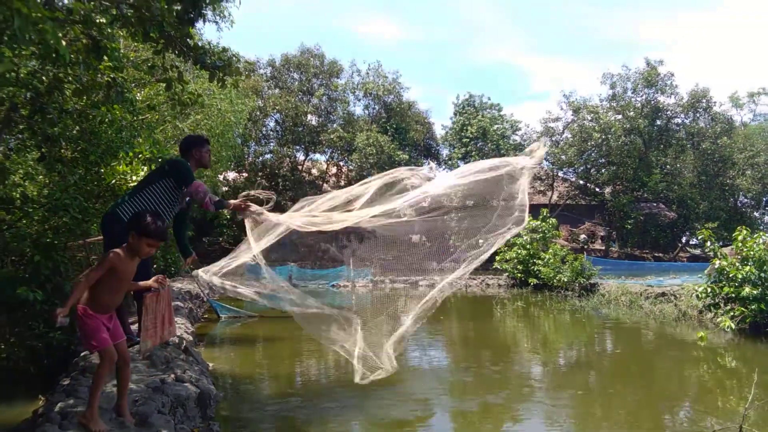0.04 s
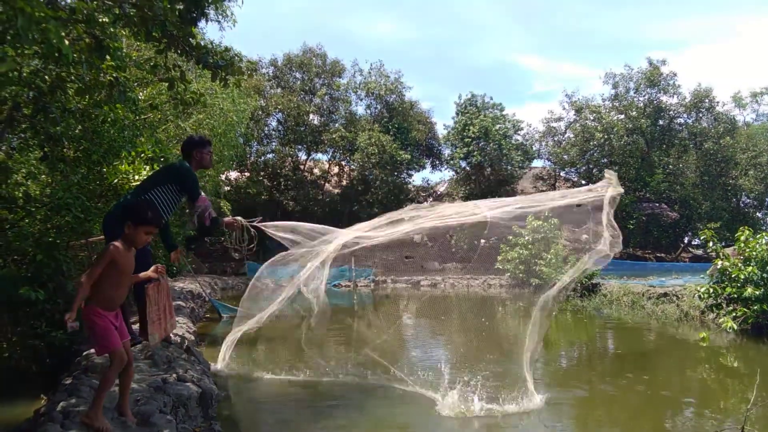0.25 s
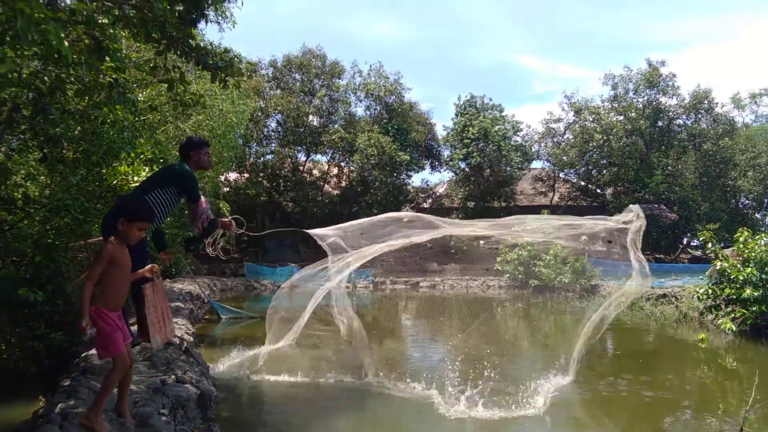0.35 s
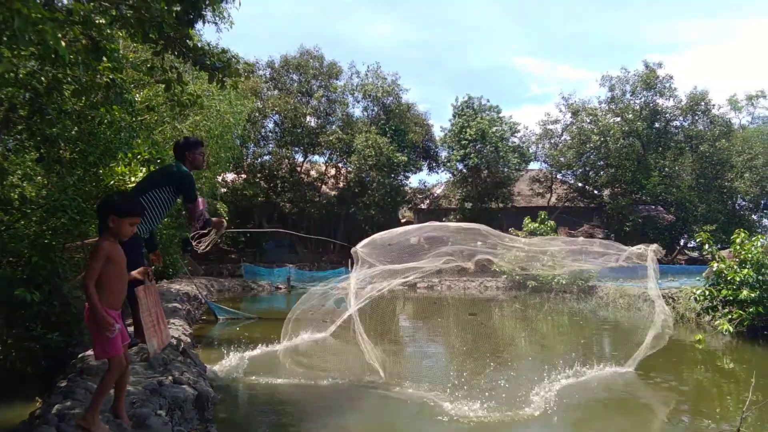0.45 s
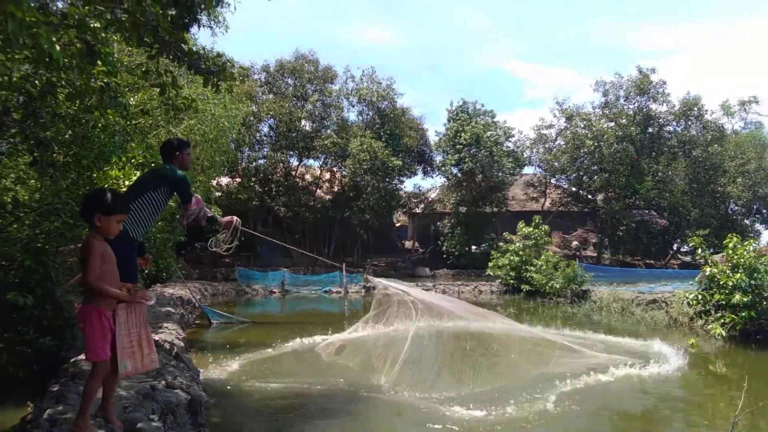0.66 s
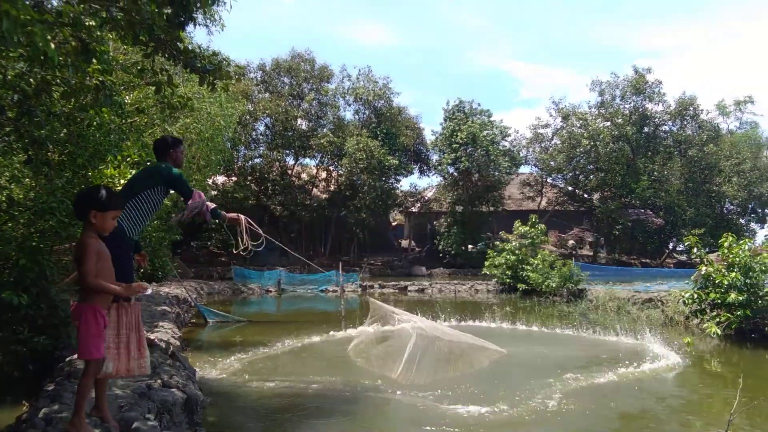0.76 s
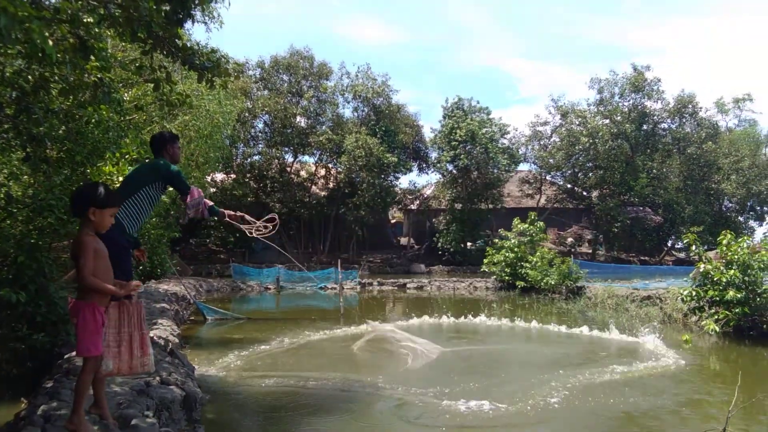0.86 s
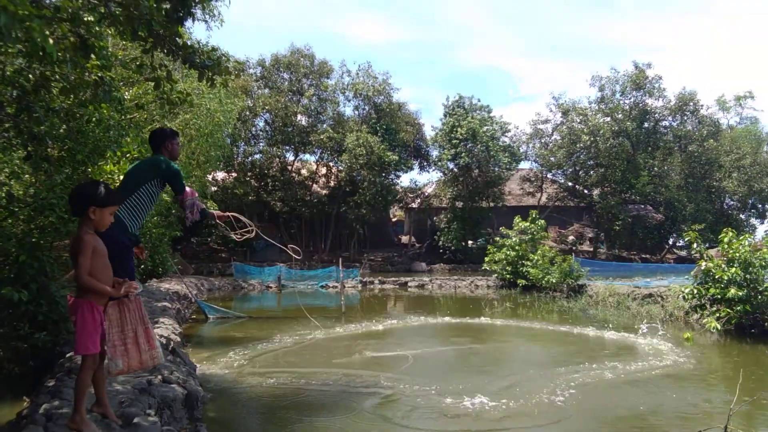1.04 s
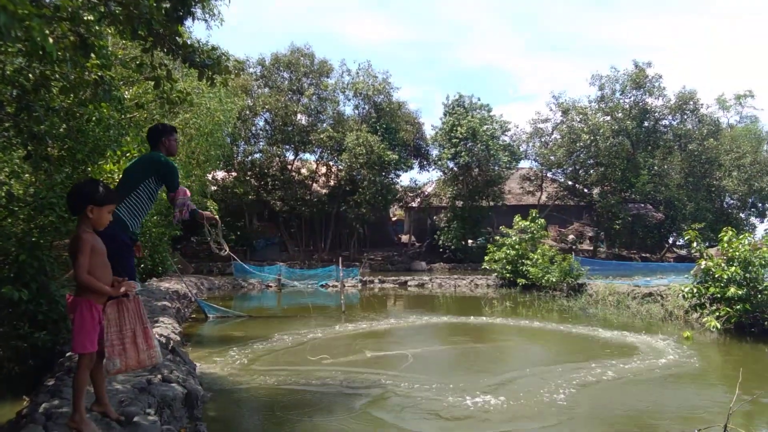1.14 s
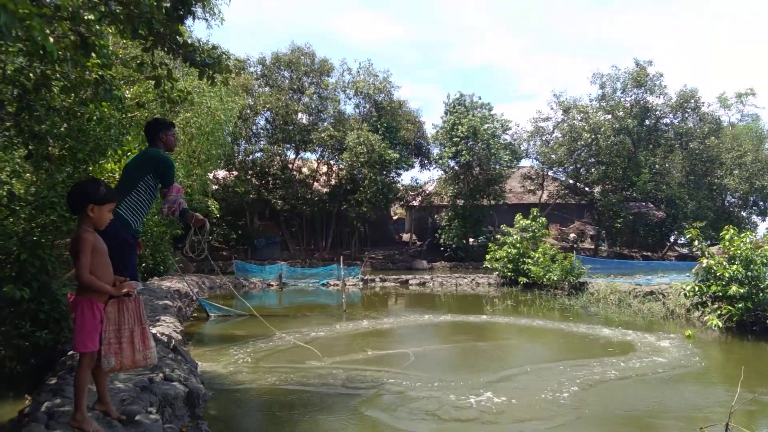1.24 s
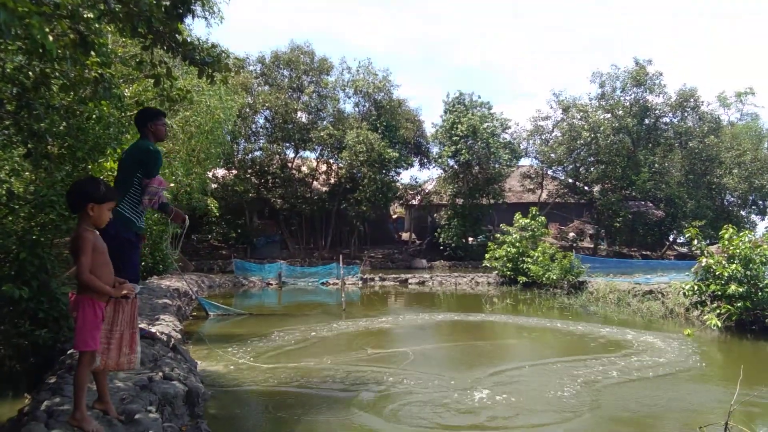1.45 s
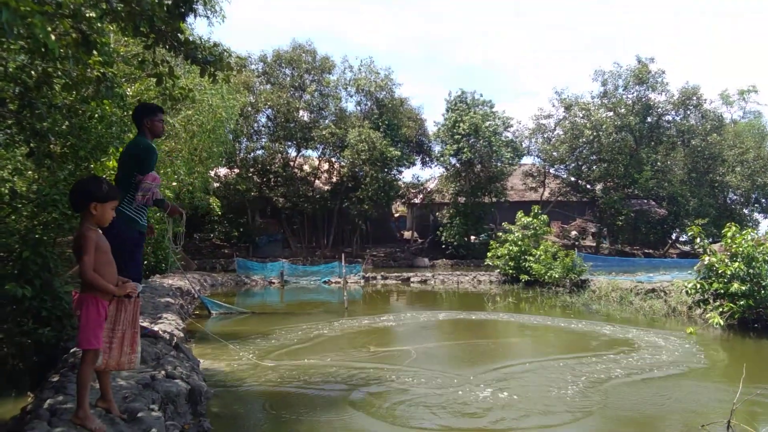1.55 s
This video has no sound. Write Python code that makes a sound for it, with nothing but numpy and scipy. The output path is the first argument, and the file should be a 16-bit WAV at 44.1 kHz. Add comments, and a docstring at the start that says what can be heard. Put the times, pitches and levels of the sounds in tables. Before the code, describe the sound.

A cast net splashes onto a pond. A bright spray starts at about 0.2 seconds, and the weighted rim slaps the water at 0.3. Droplets spatter with fizz, bubbles and small plops until about 1 second, then die away by 1.5. A faint low outdoor rumble and hiss run underneath, with one soft bump near 1.4 seconds and a very faint distant bird chirp just after.

```python
"""A cast net on a pond

A faint, brief hiss opens the scene. The net's weighted rim zips into the water with a bright spray, slaps
down and runs round the circle. Droplets spatter and entrained air rings as bubbles and a few deep plops;
then the mesh settles and the fizz dies away. Bank and trees scatter the sound. Behind it are a low
outdoor rumble, a faint hiss, a far bird and one soft bump."""
import sys
import numpy as np
from scipy import signal
from scipy.fft import rfft, irfft
from scipy.io import wavfile
from scipy.ndimage import map_coordinates

SR = 44100
rng = np.random.default_rng(int(sys.argv[2]) if len(sys.argv) > 2 else 0)


def materialize(psi):
    """Save the field psi as 16-bit PCM at rate SR to the path in sys.argv[1].

    A 1-D psi becomes a single channel; in a 2-D psi each row is a channel.
    """
    bounded = np.clip(np.atleast_2d(psi).T, -1, 1)
    quanta = np.round(bounded * 32767).astype(np.int16)
    wavfile.write(sys.argv[1], SR, quanta)


N = 70560

# Spectra of the sources (frequency [Hz], relative level [dB])
AIR_SPECTRUM = [(20, -26), (35, -20), (60, 1), (110, 5), (160, -1.5), (220, -7.5), (500, -14.5),
                (1000, -19), (2000, -19), (2600, -17), (3900, -23.5), (5700, -16), (6800, -20.5),
                (8500, -34), (12000, -42), (15500, -40)]
SPRAY_SPECTRUM = [(1000, -26), (1900, -16), (2400, -1.5), (3700, -12), (4700, -4), (6300, 1.5),
                  (7300, -10.5), (8500, -18), (12000, -25.5), (15500, -23)]
SPATTER_SPECTRUM = [(500, -39), (1030, -6.5), (1200, 1.5), (1450, -1), (1750, -2), (2050, -2.5), (2530, 1),
                    (2950, -8.5), (3500, -6), (4600, -19), (9000, -40.5)]
FIZZ_SPECTRUM = [(1500, -55.5), (2400, 1), (3900, -7.5), (5300, -1), (6200, -1), (7000, -5.5),
                 (8000, -17.5), (9000, -22), (12000, -33.5), (15500, -25.5)]
BUBBLE_SPECTRUM = [(60, -78), (170, -33.5), (250, -17.5), (380, -7.5), (550, 0), (720, 1), (900, 3.5),
                   (1050, -10.5), (1600, -19.5)]
# A faint, brief hiss at the very start, then sheets of spray (time [s], level [dB], attack [s], T60 [s])
SPRAYS = [(-.002, -50, 0.0035, 0.12), (0.2053, -42, 0.003, 0.04), (0.2465, -32.3, 0.009, 0.06),
          (.71, -41.5, 0.01, 0.17)]
# Notes of the far bird (time [s], duration [s], start frequency [Hz], end frequency [Hz], level [dB])
CHIRPS = [(0.07, 0.051, 5700, 4770, -66), (1.52, .045, 3400, 3750, -70), (1.538, .038, 5300, 4600, -65),
          (1.568, 0.024, 3970, 4010, -60)]
# Envelopes of the droplet spatter, fine fizz and bubbling (time [s], level [dB])
SPATTER_ENVELOPE = [(.2, -73), (.212, -59.5), (.28, -45.5), (.3, -39), (.322, -40.5), (.39, -43.5),
                    (.435, -41.5), (.51, -43), (.54, -39), (.57, -44), (.64, -42), (.73, -40.5),
                    (.8, -41.5), (.87, -48.5), (.97, -46.5), (1.045, -45.5), (1.09, -51), (1.2, -54),
                    (1.38, -66), (1.6, -77)]
FIZZ_ENVELOPE = [(.203, -91), (0.21, -41), (.28, -41.5), (.32, -41), (.38, -47), (.52, -43.5), (.64, -44.5),
                 (.735, -41), (.8, -44), (.89, -55), (.925, -51), (1.04, -48), (1.1, -52), (1.3, -62.5),
                 (1.6, -73)]
BUBBLE_ENVELOPE = [(.26, -74), (.295, -47.5), (0.321, -41), (0.346, -46), (.39, -51.5), (.435, -49),
                   (.51, -51.5), (.61, -50), (.68, -47), (.79, -41.5), (.84, -49), (.95, -59),
                   (1.01, -51.5), (1.09, -60), (1.25, -64), (1.45, -72.5)]
# Air pockets pulled under by the sinkers (time [s], frequency [Hz], level [dB], T60 [s])
AIR_POCKETS = [(.279, 790, -32.5, 0.019), (.296, 1666, -33, 0.033), (.3035, 790, -22.5, .016),
               (.3038, 2380, -16, .013), (.304, 1190, -32, .06), (.3097, 2500, -17, .017),
               (.318, 320, -35, .08), (.319, 850, -23.5, .026), (0.336, 260, -47.5, 0.1),
               (0.435, 1412, -28.5, 0.04), (.3535, 1230, -24.5, .021), (.481, 1640, -28, .02),
               (.534, 2500, -33, .035), (.662, 870, -26.5, 0.043), (0.688, 1130, -27, 0.035),
               (.726, 902, -30.5, 0.071), (0.739, 411, -37, 0.038), (.796, 680, -27, 0.038),
               (.799, 553, -29.5, 0.032), (.853, 587, -45, 0.056), (0.868, 451, -38.5, 0.079),
               (.893, 1380, -34, .025), (.917, 1217, -35, .025), (.968, 2380, -32.5, .018),
               (1.039, 1760, -36, .05), (1.447, 1520, -50.5, 0.031)]
# Impacts of the near rim on the water (time [s], level [dB])
RIM_IMPACTS = [(.304, -25), (.3102, -28)]


def amp(db):
    """Amplitude ratio of a level in decibels."""
    return 10 ** (np.asarray(db) / 20)


def unit_rms(x):
    """Normalisation to an rms of 1."""
    return x / np.sqrt(np.mean(x ** 2) + 1e-20)


def since(onset):
    """Seconds elapsed from the onset, zero before it."""
    return np.maximum(np.arange(N) / SR - onset, 0)


def decay(t, t60):
    """Exponential damping: 60 dB in t60 seconds."""
    return amp(-60 * t / t60)


def envelope(points):
    """Gain per sample, interpolated linearly in decibels."""
    return amp(np.interp(np.arange(N) / SR, *np.transpose(points)))


def wobble(knots_per_s):
    """Smooth random modulation: a spline through Gaussian values."""
    return map_coordinates(rng.standard_normal(N // 20), [np.arange(N) * knots_per_s / SR], mode="wrap")


def coloured(x, spectrum):
    """Minimum-phase filtering to a spectral shape, at an rms of 1."""
    size = 2 * N
    hz, db = np.transpose(spectrum)
    gain = amp(np.interp(np.log(np.fft.rfftfreq(size, 1 / SR) + 1), np.log(hz), db))
    cepstrum = irfft(np.log(gain), size)
    causal_fold = np.r_[1, np.full(N - 1, 2), np.zeros(N)]
    response = np.exp(rfft(cepstrum * causal_fold))
    return unit_rms(irfft(rfft(x, size) * response, size)[:N])


def ring(onset, hz, t60, rise, attack_s=0.0013):
    """A damped oscillator whose frequency at first climbs by the fraction rise per t60."""
    t = since(onset)
    phase = 2 * np.pi * hz * t * (1 + rise * np.minimum(t / t60, 2) / 2)
    return np.sin(phase) * decay(t, t60) * (1 - np.exp(-t / attack_s))


def outdoor_air():
    """Stationary broadband noise, heard as a low rumble and a faint hiss."""
    return amp(-58) * coloured(rng.standard_normal(N), AIR_SPECTRUM)


def sprays():
    """Transient noise: a faint, brief bright hiss at the very start, then spray as the net lands."""
    swell = sum(amp(db) * np.minimum(since(onset) / attack, 1) * decay(since(onset + attack), t60)
                for onset, db, attack, t60 in SPRAYS)
    return swell * coloured(rng.standard_normal(N), SPRAY_SPECTRUM)


def bird():
    """Frequency modulation: each thin note is a gliding tone with a slight waver."""
    notes = np.zeros(N)
    for onset, duration, start_hz, end_hz, db in CHIRPS:
        progress = np.minimum(since(onset) / duration, 1)
        hz = (start_hz + (end_hz - start_hz) * progress) * (1 + 0.02 * wobble(300))
        notes += amp(db) * np.sin(np.pi * progress) * np.sin(2 * np.pi * np.cumsum(hz) / SR)
    return notes


def bubble_cloud(per_s, lo_hz, hi_hz, cycles, spread_db, rise):
    """Bubble resonance in bulk: damped, rising sines of random onset, pitch, life and strength."""
    when, pitch, life, strength = np.hsplit(rng.random((int(per_s * N / SR), 4)), 4)
    hz = lo_hz * (hi_hz / lo_hz) ** pitch
    t60 = cycles * (.5 + life) / hz
    t = np.arange(int(min(t60.max(), .04) * SR) + 2) / SR
    gain = amp(spread_db * np.minimum(-np.log(1 - strength), np.pi)) * hz
    phase = 2 * np.pi * hz * t * (1 + rise * t / t60 / 2)
    rings = gain * decay(t, t60) * np.sin(phase)
    samples = (when * N).astype(int) + np.arange(len(t))
    return unit_rms(np.bincount(samples.ravel(), rings.ravel(), N)[:N])


def splash():
    """Incoherent superposition: droplets and bubbles arrive in shared clumps under a smoother fizz."""
    clumps = amp(1.21 * wobble(70.2))
    drops = bubble_cloud(per_s=1400, lo_hz=900, hi_hz=3800, cycles=22, spread_db=3, rise=.12)
    fizz = bubble_cloud(per_s=4500, lo_hz=2500, hi_hz=14000, cycles=35, spread_db=3.5, rise=.05)
    bubbles = bubble_cloud(per_s=650, lo_hz=260, hi_hz=1200, cycles=12, spread_db=2, rise=.2)
    flicker = amp(0.67 * wobble(69.7))
    layers = [(drops, 1.62, SPATTER_SPECTRUM, clumps * envelope(SPATTER_ENVELOPE)),
              (fizz, 1.2, FIZZ_SPECTRUM, flicker * envelope(FIZZ_ENVELOPE)),
              (bubbles, 0.45, BUBBLE_SPECTRUM, clumps * envelope(BUBBLE_ENVELOPE))]
    # wash is the noise of unresolved spray, as an amplitude relative to its cloud
    return sum(gain * coloured(cloud + wash * rng.standard_normal(N), spectrum)
               for cloud, wash, spectrum, gain in layers)


def plops():
    """Minnaert resonance: each large air pocket rings, rising in pitch as it nears the surface."""
    return sum(amp(db) * ring(onset, hz, t60, rise=0.17) for onset, hz, db, t60 in AIR_POCKETS)


def rim_slaps(attack_s=0.00082, t60=0.0077):
    """Impact noise: a short crack where a run of sinkers lands together."""
    bursts = sum(amp(db) * np.minimum(since(onset) / attack_s, 1) * decay(since(onset), t60)
                 for onset, db in RIM_IMPACTS)
    return bursts * coloured(rng.standard_normal(N), SPATTER_SPECTRUM)


def bump():
    """A heavily damped low oscillation, heard as one soft bump."""
    return amp(-39.5) * ring(onset=1.384, hz=117, t60=0.044, rise=0)


def bank_scatter(x, t60=0.33, build_up_s=0.0022):
    """Diffuse reflection from the bank and trees: convolution with decaying noise."""
    t = np.arange(SR // 2) / SR
    tail = rng.standard_normal(len(t)) * decay(t, t60) * (1 - np.exp(-t / build_up_s))
    return signal.fftconvolve(x, tail / np.linalg.norm(tail))[:N]


def scene():
    """Superposition of direct sound, its reflections and the background, in one channel."""
    direct = splash() + sprays() + rim_slaps() + plops() + bird()
    return (direct + amp(-11) * bank_scatter(direct) + outdoor_air() + bump())[None]


def record(dry):
    """Band limiting by an ideal low-pass filter."""
    cutoff_hz = 15600
    passband = np.fft.rfftfreq(2 * N, 1 / SR) < cutoff_hz
    return irfft(rfft(dry, 2 * N) * passband, 2 * N)[:, :N]


dry = scene()
out = record(dry)
materialize(out)
```